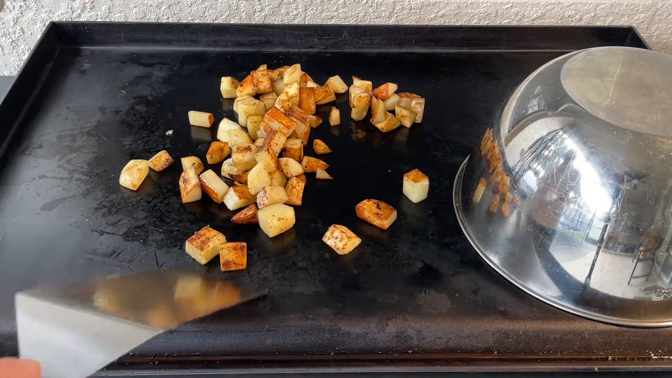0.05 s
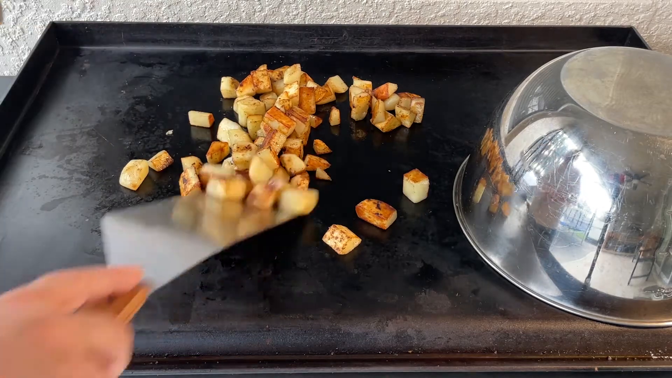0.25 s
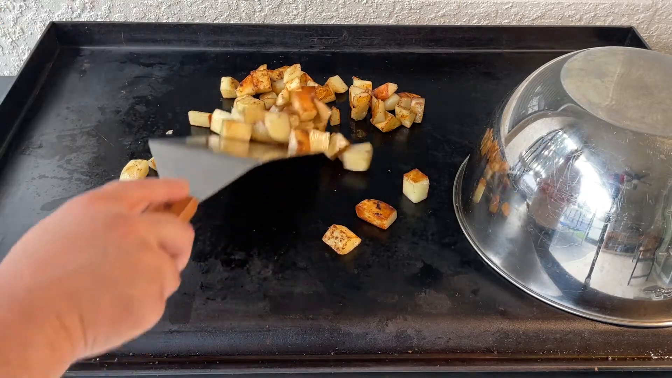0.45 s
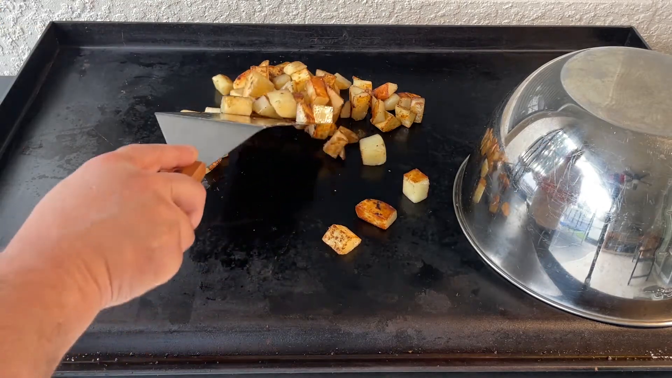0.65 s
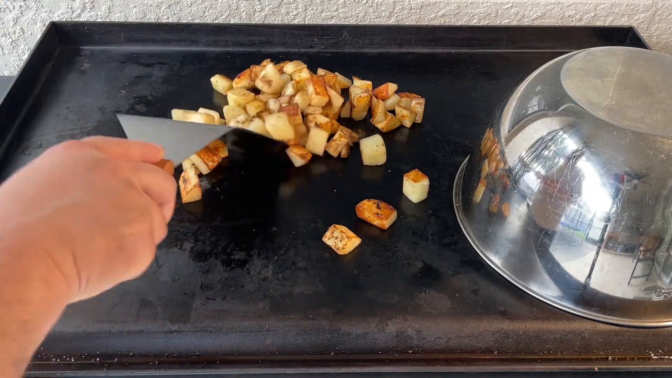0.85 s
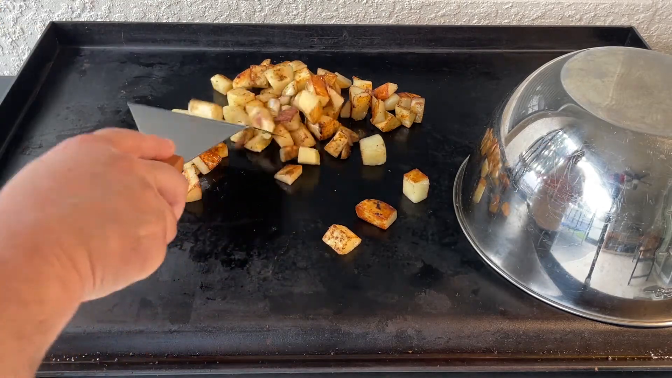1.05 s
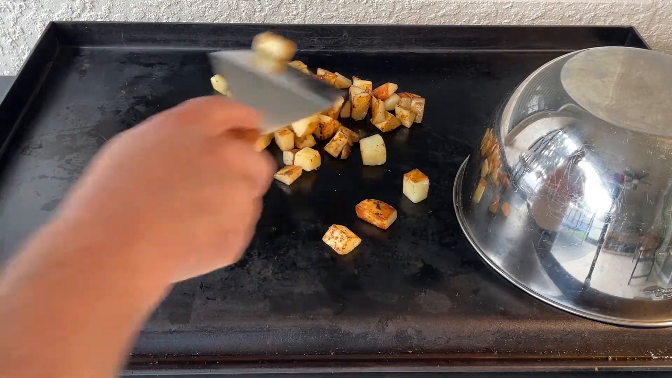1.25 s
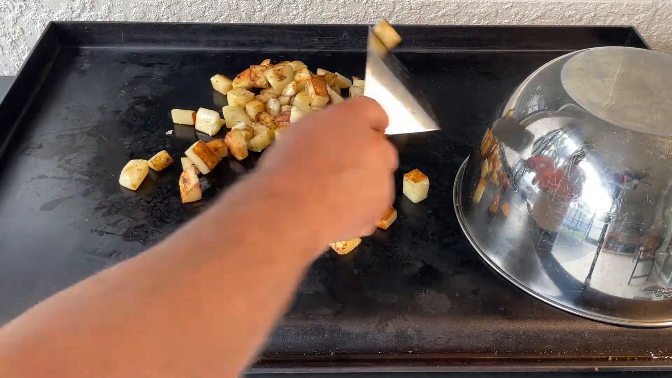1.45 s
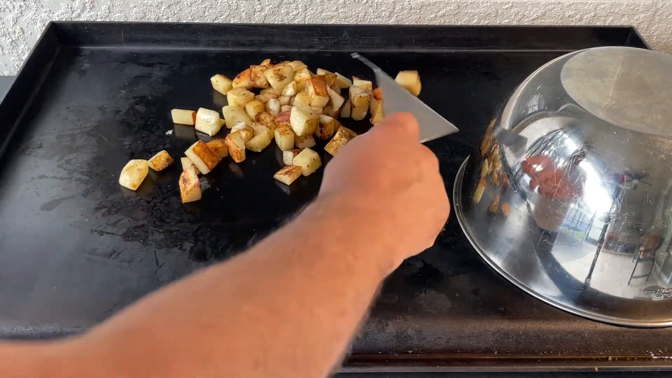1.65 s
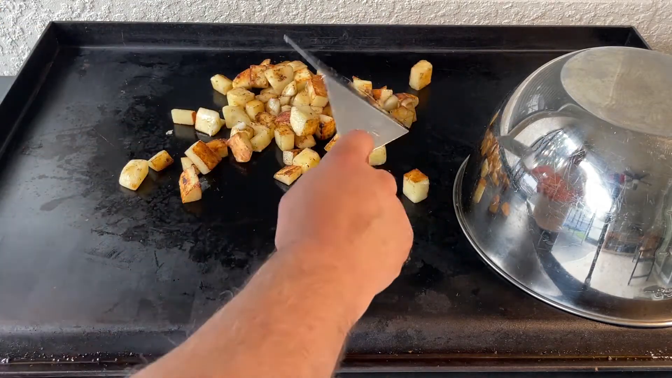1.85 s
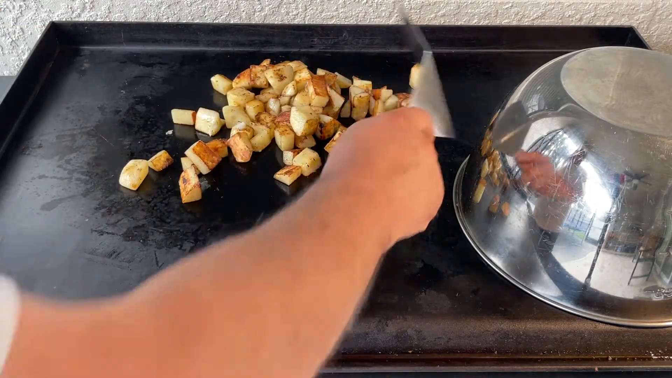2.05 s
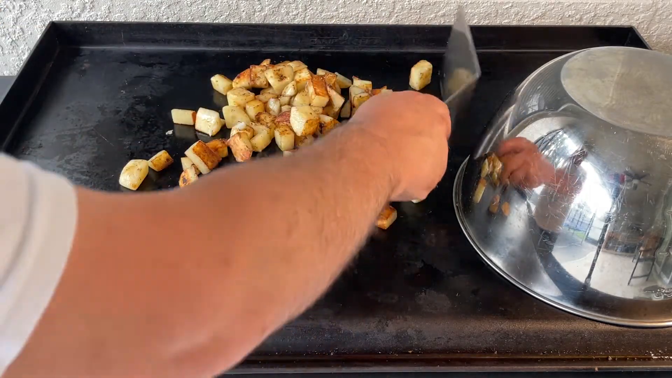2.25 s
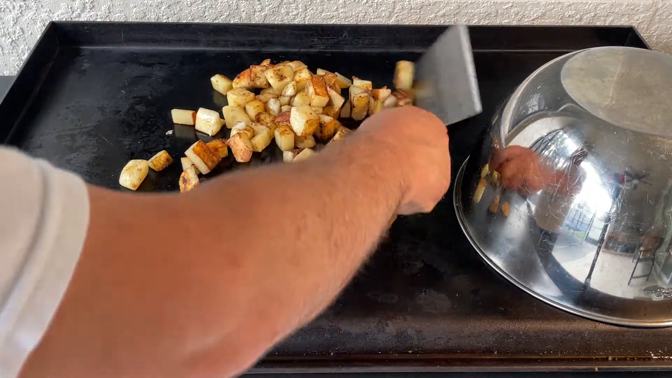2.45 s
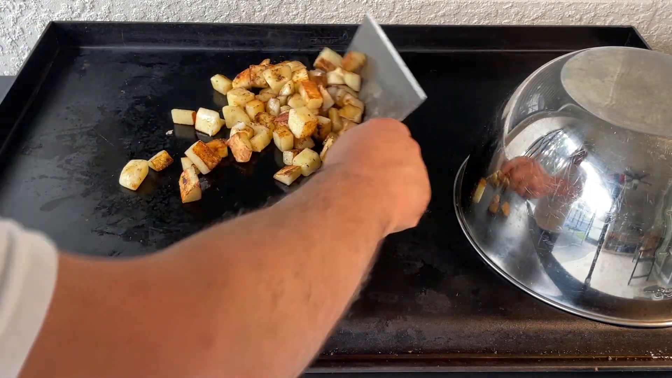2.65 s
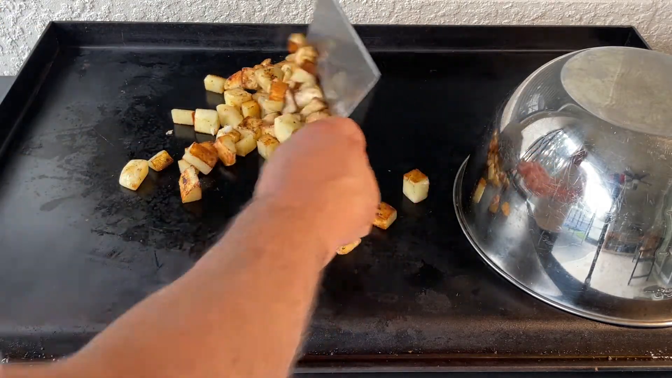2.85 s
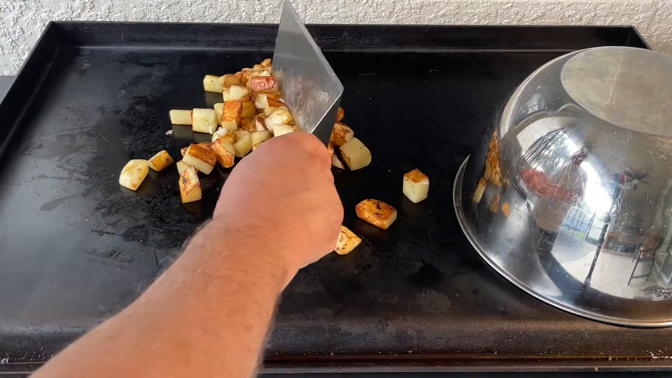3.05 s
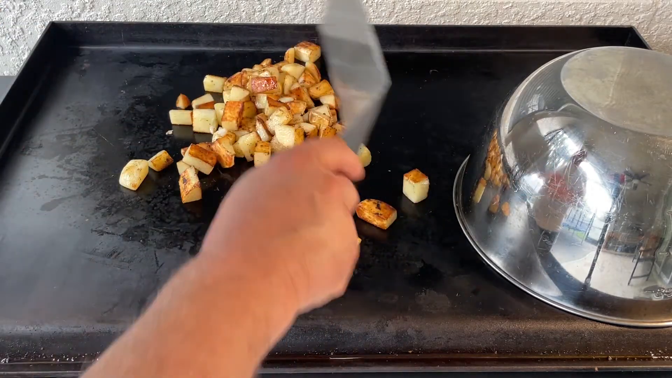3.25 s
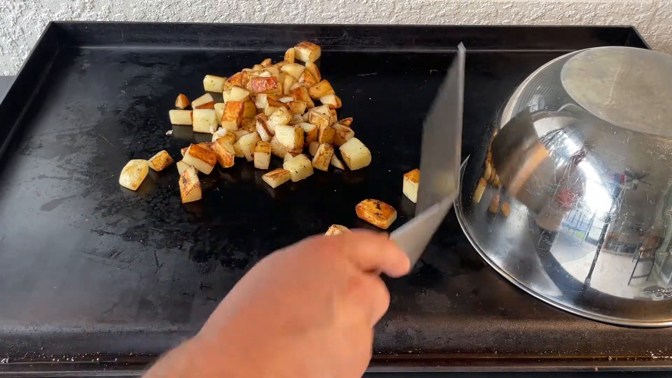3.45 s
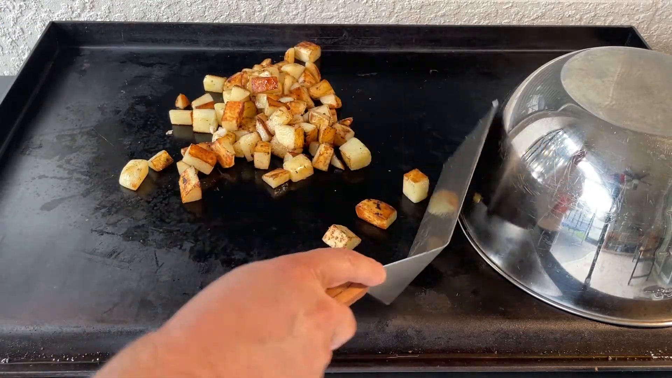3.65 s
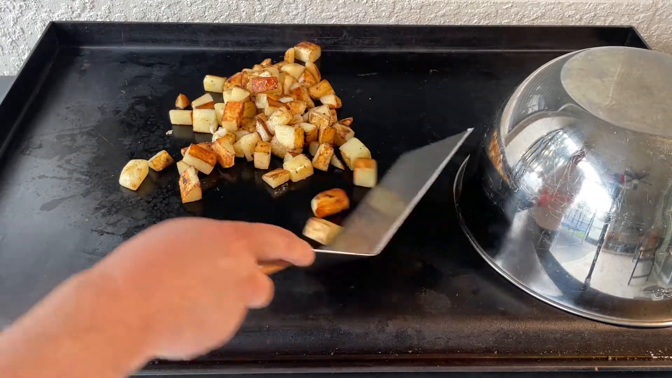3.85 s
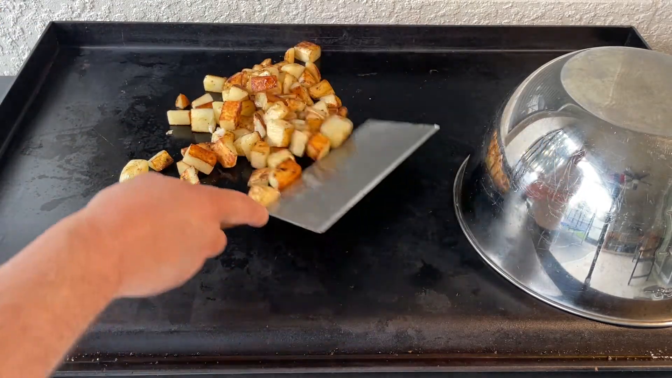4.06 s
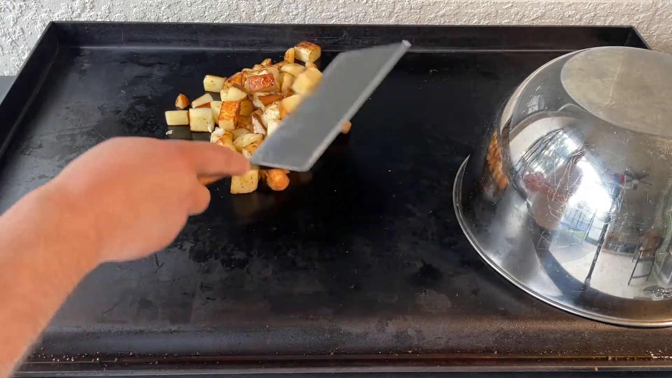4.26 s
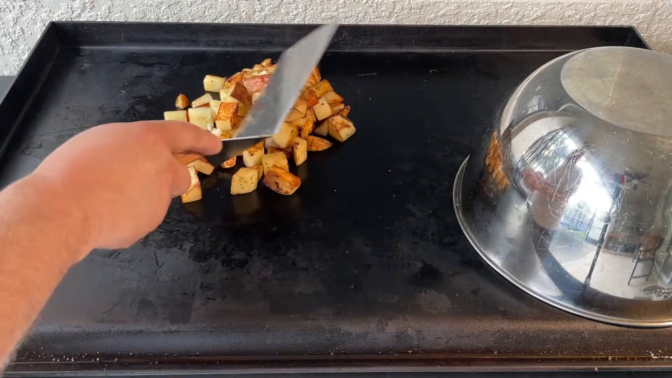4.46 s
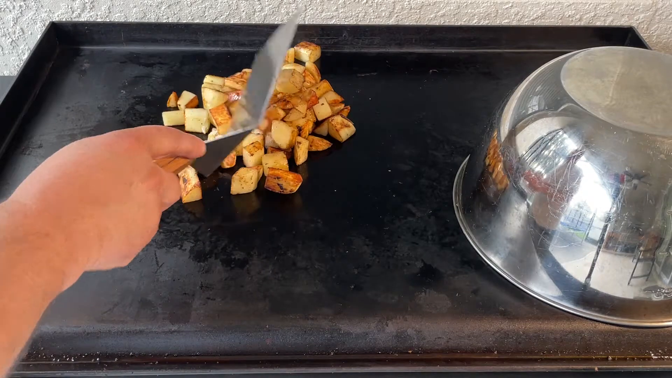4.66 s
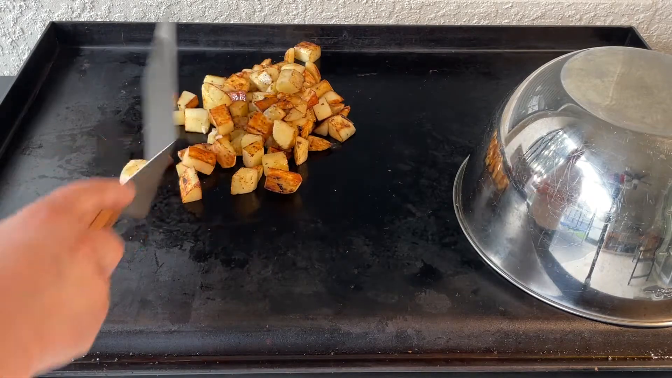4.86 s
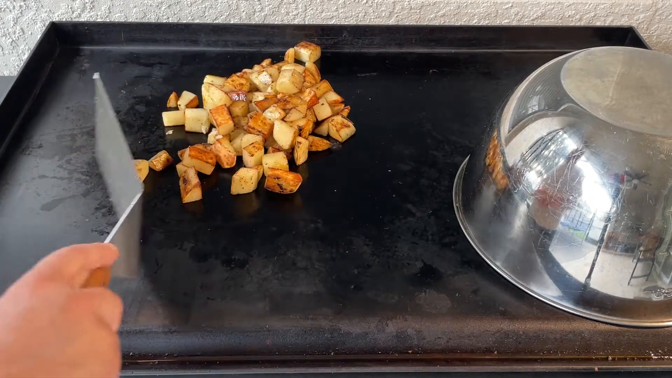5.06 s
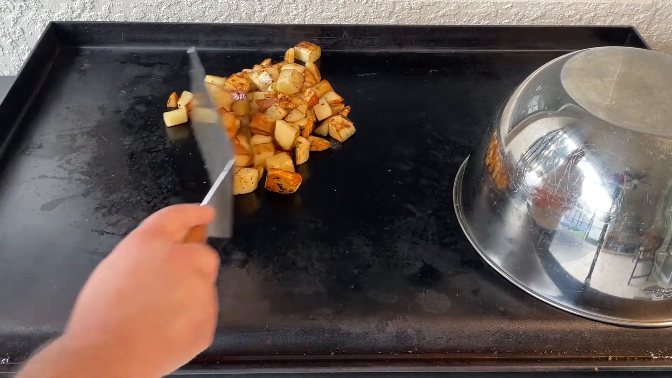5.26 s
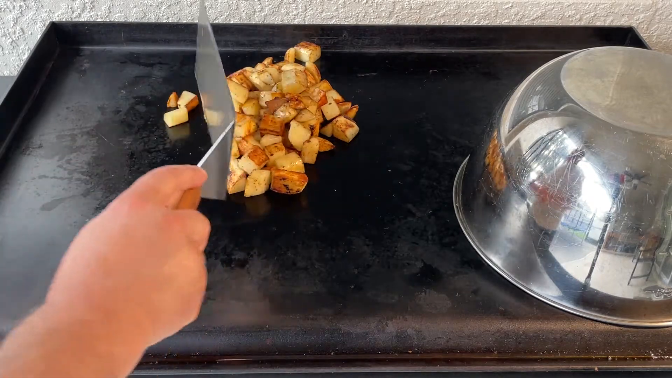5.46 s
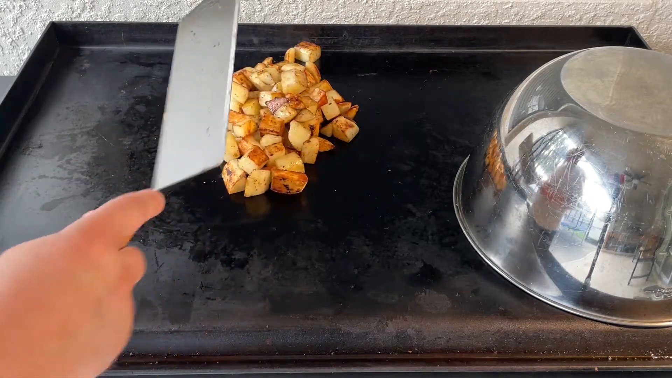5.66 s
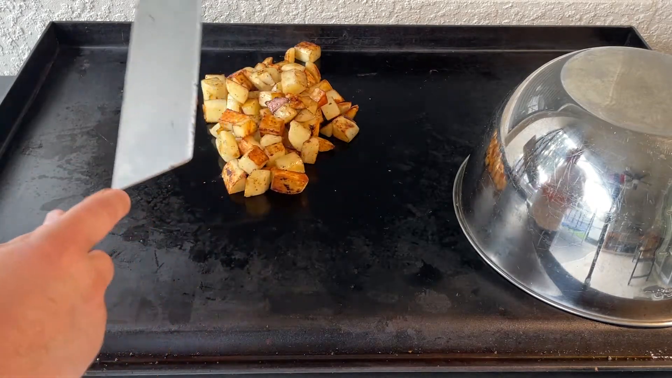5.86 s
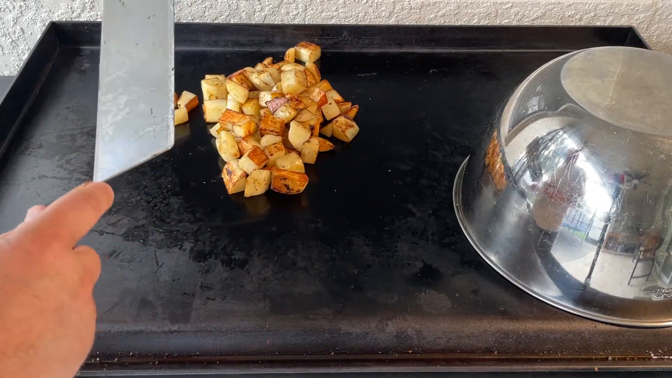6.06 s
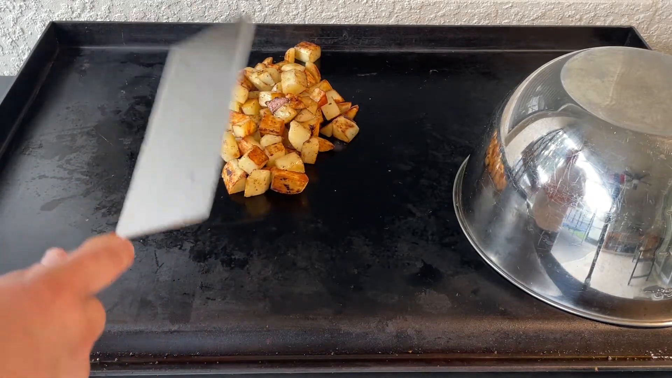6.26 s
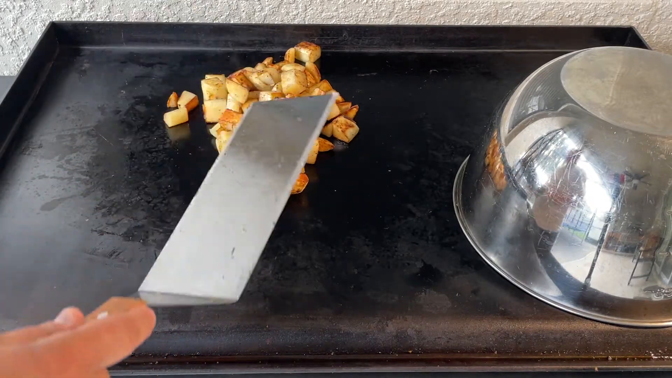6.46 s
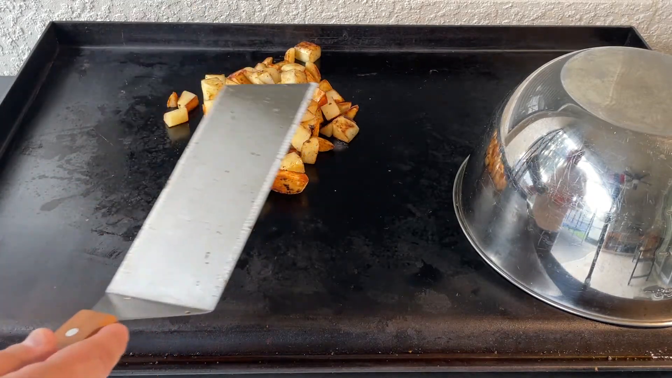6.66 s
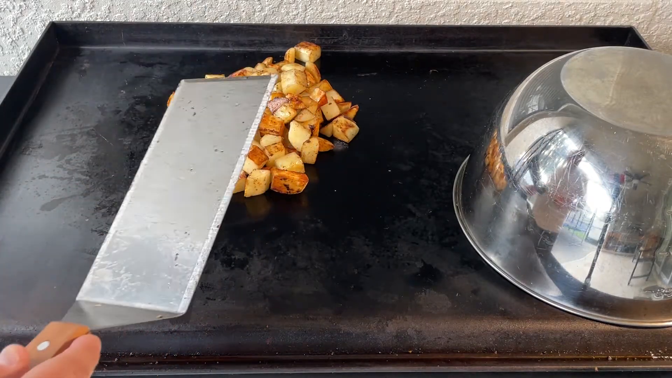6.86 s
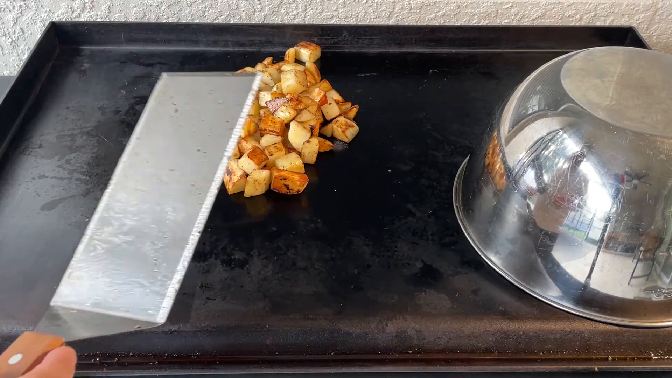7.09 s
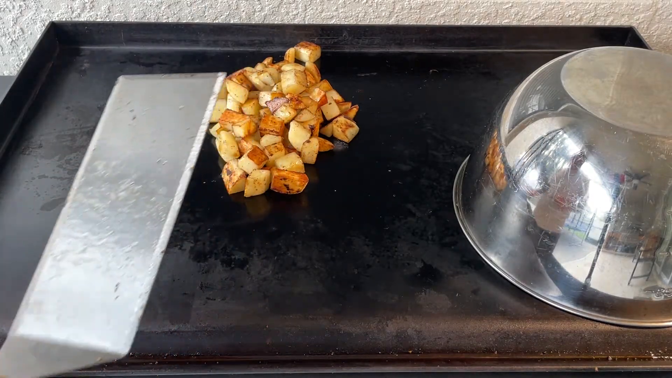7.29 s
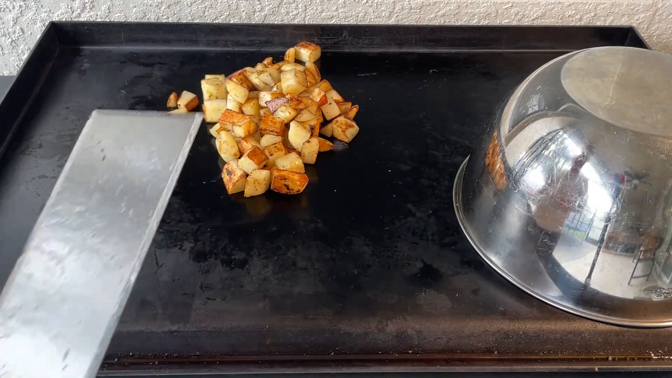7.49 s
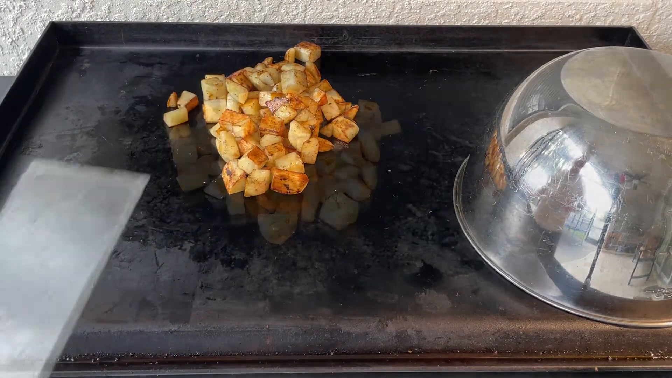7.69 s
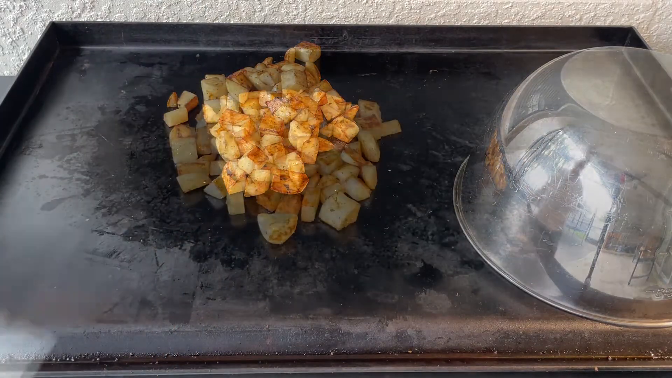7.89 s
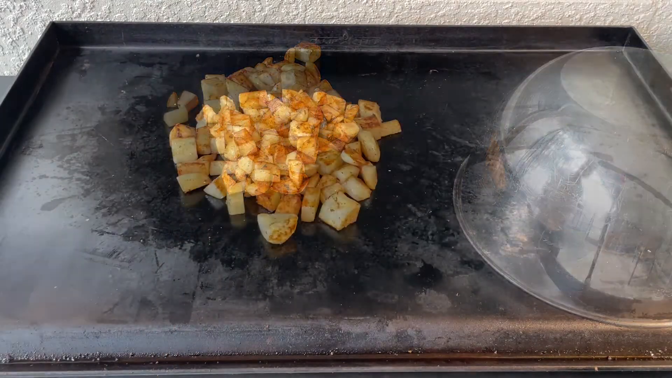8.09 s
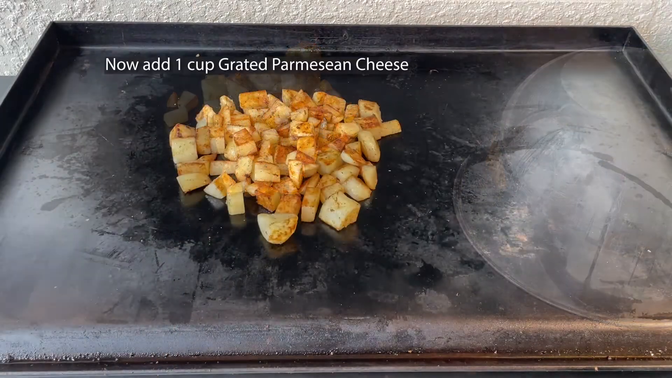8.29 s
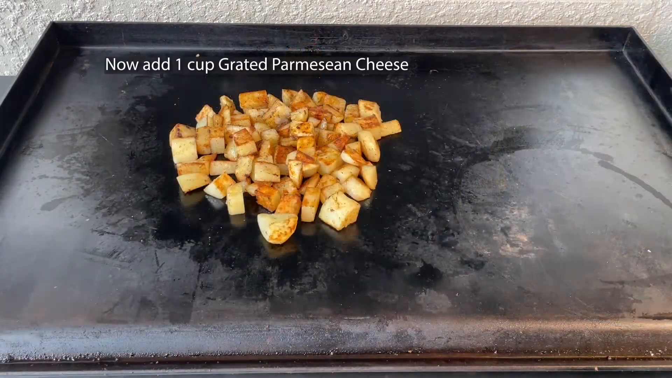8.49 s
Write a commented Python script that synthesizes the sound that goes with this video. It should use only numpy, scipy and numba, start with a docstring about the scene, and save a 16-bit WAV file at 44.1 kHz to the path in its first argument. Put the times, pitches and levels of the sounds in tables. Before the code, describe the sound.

Low gas burner rumble and fine frying hiss lie under bursts of metalwork, captured close in stereo in open air. A bright double clack and quick scrapes open, soft tumbling and oil snaps follow, then a clang, a long rasp, a short squeal and a strong ringing blow. After that it calms to a faint sizzle, a light rattle as the spatula is laid down, and dull hollow knocks.

```python
"""Outdoors at a gas griddle, a steel spatula knocks and scrapes fried potato cubes into a heap.
Blows and stick-slip friction excite the modes of the cooking plate, its frame and the thin blade.
Bursting steam bubbles sizzle and oil spits, livelier as the cubes are moved; burners rumble below.
Late on, the spatula is put down on a side shelf and something hollow knocks nearby."""
import sys
import numpy as np
from scipy import signal
from scipy.fft import rfft, irfft
from scipy.io import wavfile
from scipy.ndimage import uniform_filter1d
from numba import njit

SR = 44100
rng = np.random.default_rng(int(sys.argv[2]) if len(sys.argv) > 2 else 0)


def int16_out(signal):
    """Quantize to a 16-bit WAV file."""
    q = np.round(np.clip(np.atleast_2d(signal).T, -1, 1) * 32767)
    wavfile.write(sys.argv[1], SR, q.astype(np.int16))


N = 376153
T = np.arange(N) / SR


def undb(db):
    """Logarithmic level: decibels to amplitude gain."""
    return 10 ** (np.asarray(db) / 20)


def unit(x):
    """Normalisation: scale to rms 1."""
    return x / np.sqrt(np.mean(x ** 2) + 1e-20)


def lookup(points, hz):
    """Interpolation of (Hz, value) points on a log-frequency axis."""
    point_hz, value = np.transpose(points)
    return np.interp(np.log(hz + 1), np.log(np.sort(point_hz) + 1), value)


def colour(x, points):
    """Linear filtering: multiply the spectrum by a (Hz, dB) curve."""
    size = x.shape[-1]
    gain = undb(lookup(points, np.fft.rfftfreq(size, 1 / SR)))
    return irfft(rfft(x) * gain, size)


def stereo(mid, side, width):
    """Mid-side sum: left and right from a shared and an opposed part."""
    return np.array([mid + width * side, mid - width * side])


def add(out, s, x):
    """Superposition: mix x into out from time s on."""
    start = max(int(s * SR), 0)
    out[:, start:start + x.shape[1]] += x[:, :N - start]


def walk(rate):
    """Slow random fluctuation: steps at the given rate, smoothed twice."""
    hold = int(SR / rate)
    steps = np.repeat(rng.standard_normal(N // hold + 1), hold)
    return 1.3 * uniform_filter1d(uniform_filter1d(steps, hold), hold)[:N]


def grains(rate, spread_db, size=N):
    """Shot noise: random impulses of either sign, their levels spread exponentially in dB."""
    hit = rng.random(size) < rate / SR
    strength = undb(spread_db * np.minimum(rng.exponential(size=size), 6))
    return unit(hit * strength * rng.choice([-1, 1], size))


def wide_noise(size, width, spectrum):
    """Broadband noise, coloured and of unit rms, with a partly opposed left and right."""
    mid, side = rng.standard_normal((2, size))
    return unit(colour(stereo(mid, side, width), spectrum))


def swell(s, rise_s, hold_s, fall_s):
    """Envelope from time s on: a smooth rise, a hold and an exponential fall."""
    rise = np.sin(np.pi / 2 * np.clip((T - s) / rise_s, 0, 1)) ** 2
    return rise * np.exp(-np.maximum(T - s - rise_s - hold_s, 0) / fall_s)


@njit
def ring(hz, t60, weight, size):
    """Modal superposition: decaying sinusoids, each with a complex weight left and right."""
    out = np.zeros((2, size))
    for k in range(len(hz)):
        pole = np.exp((2j * np.pi * hz[k] - np.log(1000) / t60[k]) / SR)
        z = 1 + 0j
        for i in range(min(size, int(t60[k] * SR))):
            out[0, i] += (weight[0, k] * z).imag
            out[1, i] += (weight[1, k] * z).imag
            z *= pole
    return out


def body(modes, crowd, count, t60, damping, scatter):
    """Modal density: weaker modes lie evenly, ring about t60 at 1 kHz and die sooner higher up."""
    low_hz, high_hz = crowd[0][0], crowd[-1][0]
    hz = low_hz + (high_hz - low_hz) * (np.arange(count) + rng.random(count)) / count
    decay = t60 * (hz / 1000) ** -damping * np.exp(scatter * rng.standard_normal(count))
    rows = np.vstack([*modes, np.column_stack([hz, lookup(crowd, hz), decay])])
    is_main = np.arange(len(rows)) < len(modes)
    return np.column_stack([rows, is_main])  # columns: Hz, dB, t60 s, is main


def response(modes, width, low_hz=0, cut_hz=np.inf, length=1, place_db=0.8, lift_db=0):
    """Impulse response: a tap near the stiff rim misses the low modes, a soft one the high ones."""
    hz, db, t60, is_main = modes.T
    # the place of contact weights the modes at random
    place, phase, bearing = rng.standard_normal((len(hz), 3)).T
    gain = undb(db + place_db * place + lift_db * is_main)
    gain = gain / np.sqrt(1 + (low_hz / hz) ** 4 + (hz / cut_hz) ** 4)
    spread = stereo(1.0, np.exp(2j * np.pi * bearing), width)
    weight = gain * np.exp(2j * np.pi * phase) * spread
    return ring(hz, np.clip(t60 * length, .01, 5), weight, 2 * SR)


def drive(force, tap):
    """Convolution of a force with a body's response, scaled by the energy of that response."""
    return signal.fftconvolve(force[None], tap, axes=1) / np.sqrt(np.sum(tap ** 2) / 2)


def impact(t, chatter, rate, spread_db, decay_s):
    """Impulsive contact: fading chatter with a unit impulse added at its start."""
    force = chatter * grains(rate, spread_db, size=len(t)) * np.exp(-t / decay_s)
    force[0] += 1
    return force


# spectrum of the burner rumble: frequency_hz, relative_level_db
BURNER_SPECTRUM = [(20, -46), (31, -17), (41, -3.5), (55, 5), (72, -3), (92, -15.5), (125, -7),
                   (215, -13.5), (300, -22), (500, -26.5), (900, -27), (1500, -33.5), (4000, -61)]


def burners():
    """Turbulent combustion noise: gas flames rumble and flutter, nearly alike left and right near 130 Hz."""
    mid, side = rng.standard_normal((2, N))
    side = colour(side, [(60, -14.5), (130, -42), (300, -2.0), (900, -0.5)])
    rumble = unit(colour(stereo(mid, side, 1), BURNER_SPECTRUM))
    return rumble * undb(-40 + 1.0 * walk(11))


# underlying sizzle, which dies down once the food is heaped and left alone: time_s, relative_level_db
SIMMER_LEVEL = [(0, -49.5), (4.9, -49.5), (6.8, -59.5), (8.5, -57.5)]
# pushes that turn moist faces of the cubes onto the steel:
# start_s, swell_s, drying_s, relative levels fine_hiss_db, coarse_frying_db, tumbling_db
STIR_PUSHES = [(0.38, .1, 0.094, -41.5, -55, -49), (0.81, 0.039, 0.59, -44.5, -54.5, -45),
               (1.251, 0.15, 0.39, -48.5, -55, -58), (1.783, 0.065, 0.42, -42.5, -46, -69),
               (2.91, 0.14, 0.5, -41, -40.5, -44.5), (3.42, 0.087, 0.21, -40.5, -62.5, -63),
               (3.74, 0.015, 0.61, -56, -58, -37.5), (3.98, 0.14, 0.082, -45.5, -49.5, -60),
               (4.21, 0.084, 0.2, -42.5, -46.5, -65), (4.289, 0.21, 0.23, -40, -49, -65),
               (5.42, 0.1, 1, -53, -72, -53), (7.18, 0.46, .4, -51, -71, -66)]
# spectra of fine hiss, coarse frying and tumbling cubes: frequency_hz, relative_level_db
HISS_SPECTRUM = [(2500, -57), (5500, -6), (8500, -2.5), (11000, 2.5), (16000, 0.5)]
FRYING_SPECTRUM = [(300, -5), (900, -7), (2000, -0.5), (5000, 0), (7500, -4), (12000, -68)]
TUMBLE_SPECTRUM = [(30, -20), (90, 8), (190, 6), (350, -2), (800, -9), (1500, -9), (4000, -10.5)]
SETTLE_DB = -51  # cubes settling in the heap, relative like the tumbling levels


def frying(frame, plate):
    """Bubble noise: bursting steam hisses and crackles, flaring at each push; soft cubes bump the steel."""
    simmer_db = np.interp(T, *np.transpose(SIMMER_LEVEL))
    power = undb([simmer_db, simmer_db, np.full(N, SETTLE_DB)]) ** 2
    for s, rise_s, dry_s, hiss_db, fry_db, tumble_db in STIR_PUSHES:
        flare = undb([[hiss_db], [fry_db], [tumble_db]]) * swell(s, rise_s, 0, dry_s)
        power = power + flare ** 2
    hiss, fry, tumble = np.sqrt(power)
    fine = stereo(grains(rate=15000, spread_db=3.5), grains(rate=14000, spread_db=0), width=0.0088)
    coarse = stereo(grains(rate=9000, spread_db=3.0), grains(rate=9000, spread_db=-2), width=0.051)
    out = unit(colour(fine, HISS_SPECTRUM)) * hiss * undb(7.5 + 1.0 * walk(45))
    out += unit(colour(coarse, FRYING_SPECTRUM)) * fry * undb(3.5 + 0.88 * walk(35))
    bumps = unit(colour(grains(rate=160, spread_db=2.5), TUMBLE_SPECTRUM)) * tumble
    out += undb(-5.5) * drive(bumps, response(frame, width=0.3, length=0.14))[:, :N]
    out += undb(-3.0) * drive(bumps, response(plate, width=0.58, length=0.46))[:, :N]
    return out


# the loudest spits of oil: start_s, relative_level_db
LOUD_SPITS = [(0.4888, -27), (0.557, -34), (0.844, -26), (1.458, -25), (2.165, -24), (2.4277, -25.5),
              (3.507, -26), (3.5327, -23.5), (6.122, -29.5), (6.233, -33.5), (6.434, -31.5), (6.558, -37),
              (7.199, -36), (7.392, -41.5), (7.423, -39)]
# spectrum of a spit: frequency_hz, relative_level_db
SPIT_SPECTRUM = [(600, -31), (2000, -1.5), (5000, 2.5), (9000, 0), (16000, 5.5)]
SMALL_SPITS_PER_S, SMALL_SPIT_DB, SMALL_SPIT_SPREAD_DB = 1.7, -47, 11  # spread is plus or minus


def spits():
    """Transient bursts: drops snap in the oil with a brief spray; small ones come at random."""
    out, t = np.zeros((2, N)), T[:SR // 25]
    small = []
    for _ in range(int(SMALL_SPITS_PER_S * T[-1])):
        db = SMALL_SPIT_DB + SMALL_SPIT_SPREAD_DB * rng.uniform(-1, 1)
        small.append((rng.uniform(0, T[-1]), db))
    snap_and_spray = np.exp(-t / 0.0017) + 0.29 * np.exp(-t / 0.02)
    for s, db in LOUD_SPITS + small:
        add(out, s, undb(db) * wide_noise(len(t), 0.074, SPIT_SPECTRUM) * snap_and_spray)
    return out


# dull knocks of something hollow set down nearby: start_s, level_db, cutoff_hz, gritty_contact_db
HOLLOW_KNOCKS = [(8.112, -25.5, 1700, -43), (8.120, -24, 4500, -38), (8.155, -27, 1300, -52),
                 (8.236, -35, 4500, -36)]
# main modes of the hollow thing: frequency_hz, relative_level_db, t60_s
HOLLOW_MODES = [(125.2, 1.5, 0.76), (315, -9, 0.73), (518, 9, 0.5), (900, 4, 0.4), (1014, 7, 0.48)]
# its crowd of weaker modes: frequency_hz, relative_level_db
HOLLOW_WEAK_MODES = [(150, -8), (400, 2), (750, -0.5), (1000, 0.5), (1600, -6), (2300, -1), (3300, -7.5),
                     (4600, -10), (6500, -23)]
# spectrum of the gritty contact: frequency_hz, relative_db_per_hz
GRIT_SPECTRUM = [(300, -12), (900, 1), (2300, 3), (4500, -5), (7000, -12), (12000, -20)]


def knocks():
    """Damped resonance: a hollow body lands on one edge, then settles with a gritty touch."""
    out, t = np.zeros((2, N)), T[:SR // 8]
    attack = SR // 25  # samples over which the level is set
    hollow = body(HOLLOW_MODES, HOLLOW_WEAK_MODES, count=240, t60=0.51, damping=0.36, scatter=0.044)
    for s, db, cut_hz, grit_db in HOLLOW_KNOCKS:
        force = impact(t, chatter=0.063, rate=900, spread_db=3.0, decay_s=0.011)
        sound = drive(force, response(hollow, width=0.43, cut_hz=cut_hz))
        add(out, s, sound * undb(db) / sound[:, :attack].std())
        grit = unit(colour(grains(rate=4000, spread_db=2.0, size=len(t)), GRIT_SPECTRUM))
        add(out, s, stereo(grit, 0, 0) * undb(grit_db) * np.exp(-t / 0.018))
    return out


# modes of the blade's tip, then of the shelf under the handle: frequency_hz, relative_level_db, t60_s
TIP_MODES = [(2940, 1, .07), (3910, -6, 0.27), (5030, -7, .08), (5230, 12, 0.041), (7130, 1, .07),
             (8450, 0, .03)]
SHELF_MODES = [(343, 9.5, .2), (383, 11, 0.19), (663, 3, 0.49), (1070, 4.5, 0.25), (1140, 6, 0.26),
               (1220, 1, .2), (1810, -4, 0.23), (1800, -2, 0.22), (2010, -6, 0.29), (2080, 1, 0.31),
               (2850, -6, 0.18)]
PUT_DOWN_S, HANDLE_LAG_S = 7.5078, 0.009
TIP_DB, SHELF_DB = -41.5, -42.5  # gains on the summed modes


def put_down():
    """Successive impacts: the tip ticks on the side shelf and the handle drops after it with a small rattle."""
    out, t = np.zeros((2, N)), T[:SR // 8]
    landings = ((PUT_DOWN_S, TIP_DB, TIP_MODES), (PUT_DOWN_S + HANDLE_LAG_S, SHELF_DB, SHELF_MODES))
    for s, db, modes in landings:
        force = impact(t, chatter=0.022, rate=600, spread_db=2.5, decay_s=0.025)
        tap = response(np.column_stack([modes, np.ones(len(modes))]), width=0.4, length=1.0)
        add(out, s, undb(db) * signal.fftconvolve(force[None], tap, axes=1))
    return out


# squeals of the slipping edge; the last row is a short ring, perhaps of a nudged bowl:
# start_s, length_s, pitch_hz, level_db
SQUEAL_TONES = [(0.008, .035, 10900, -25), (0.235, .05, 5860, -32), (3.748, .056, 3970, -20.5),
                (3.742, .062, 5110, -21), (3.742, .03, 9950, -25), (3.865, .125, 10120, -35),
                (3.915, .07, 6130, -38), (3.895, .11, 7190, -38), (3.905, .1, 11200, -35),
                (3.87, .09, 9320, -38), (4.78, .11, 1620, -47), (5.27, .22, 3060, -38),
                (5.29, .17, 3623, -42), (3.741, .032, 790, -19)]


def squeals():
    """Frequency modulation: squeals of the slipping edge and one short ring waver, swell and die."""
    out = np.zeros((2, N))
    for s, length_s, hz, db in SQUEAL_TONES:
        size = int(length_s * SR)
        waver, flutter = (unit(uniform_filter1d(x, SR // 200)) for x in rng.standard_normal((2, size)))
        phase = 2 * np.pi * np.cumsum(hz * (1 + 0.0062 * waver)) / SR
        tone = unit(np.sin(phase) * undb(3.5 * flutter))
        add(out, s, stereo(tone, 0, 0) * signal.windows.hann(size) * undb(db))
    return out


# main modes of the cooking plate: frequency_hz, t60_s, then relative levels when touched at
# left_db, front_db, middle_db, back_db, far_corner_db, right_db
PLATE_MAIN_MODES = [(479, 1.9, -16.5, -10, -24, -8.5, -26.5, -11.5),
                    (577, 1.5, -13, -9, -11.5, -10.5, -15, -7),
                    (624, 0.83, -15, -21, -29.0, -21, -24.0, -16),
                    (731, 1.74, -18.0, -10, -19, -15, -20.5, -26),
                    (776.0, 1.4, -18, -8.0, -20.0, -8.0, -17.5, -7),
                    (803.0, 1.55, -16.5, -7, -23, -21, -31.5, -12),
                    (967.0, 0.7, -11.5, -16.0, -21, -11, -13, -12.5),
                    (992, 0.52, -21, -16, -26, -16.0, -7, -19), (1103, 1.26, -8.5, -9.5, -11, -1, -12, -12),
                    (1138, 0.76, -12, -1, -1.5, 1, -23.5, 2), (1166, 1.1, -14, -8, -21.5, -2, -28, -18.0),
                    (1273, 1.15, -20, -4, -26.0, -19.0, -22, -9),
                    (1404, 1.1, -10, -2, -5.5, -2.5, -11, -10.0), (1416, 0.3, -2.5, 4.5, -7.5, 5, 6, -4.0),
                    (1434, 2.37, -12, -4.5, -16.5, -8.0, -18.5, -17.5),
                    (1482, 1.5, -11.5, -12, -30.0, -8, -26.5, -27),
                    (1620.0, 0.77, -13.5, 2, -22, -14.0, -32, -26),
                    (1663.0, 0.89, -27.5, -6.0, -24, -16.0, -18.5, -9),
                    (1724.0, 1.1, -9.5, -3, -32.0, -10, -13, -15), (1773, 0.51, -0.5, -6, -26, -5, -7, -16),
                    (1906, 0.46, -24.0, -6, -19, -4.0, -6, -14),
                    (1984, 0.67, -6.5, -3, -21.0, -17.5, -15.0, -20),
                    (2030, 0.76, -9, -15.5, -18.0, -16, -22.0, -21),
                    (2120.0, 0.5, -24.5, -7, -17, 3, -10, -24),
                    (2160, 0.46, -6.5, -7, -12, -8.0, -5.5, -7.0),
                    (2184, 0.47, -6, -4, -12.5, -3, -9, -1.5),
                    (2211.0, 0.64, -22, -9, -25.5, -4, -28.0, -5),
                    (2315, 0.7, -24, -4, -19, 2.5, -24, -20.5),
                    (2385.0, 0.58, -9.0, -16.5, -24, -3, -33.0, -23),
                    (2420, 0.7, -14, -13, -22, -21.0, -24, -21),
                    (2541.0, 0.82, -17, -14, -18.5, -18, -28, -16),
                    (2651.0, 0.68, -17, -16.5, -21.5, 1, -17, -18),
                    (2733, 0.57, -17, 0, -14.5, 1, -11, -12.0),
                    (2864.0, 0.496, -8, -12, -19.5, -11, -16, -12.5),
                    (3010, 0.68, -14, -17, -20, -7, -27, -10.0),
                    (3200, 0.45, -14, -0.5, -18, -18.0, -26.5, -13),
                    (3270, 0.42, -19, -9, -17.0, 0, -25.0, -23),
                    (3460, 0.35, -21, -13.5, -15, -18.5, -25.5, -18.0)]
# names of those places of contact, in column order: place
CONTACT_PLACES = ("left", "front", "middle", "back", "corner", "right")
# the shifting load of blade and food detunes each mode (rms share) and makes it flutter (rms dB)
MODE_WANDER, MODE_FLUTTER_DB = 0.001195, 2


def plate_modes():
    """Modal energy storage: contacts feed the plate's main modes by place, and they ring out unevenly."""
    step = SR // 1000  # energies are followed in steps of about a millisecond
    work = np.zeros((len(CONTACT_PLACES), len(T[::step])))
    contacts = []
    for s, place, db, *_, chatter_s, _ in BLADE_BLOWS:
        contacts.append((place, db, swell(s, 1 / SR, 0, chatter_s)))
    for s, rise_s, hold_s, place, db, *_ in BLADE_STROKES:
        contacts.append((place, db, swell(s, rise_s, hold_s, PLATE_RELEASE_S)))
    for place, db, pressure in contacts:
        power = pressure[::step] ** 2
        work[CONTACT_PLACES.index(place)] += undb(db) ** 2 * power / power.sum()
    mid, side = np.zeros((2, N))
    for hz, t60, *place_db in PLATE_MAIN_MODES:
        fed = undb(place_db) ** 2 @ work + 1e-18
        kept = np.exp(-2 * np.log(1000) * step / (t60 * SR))  # energy share left after one step
        energy = signal.lfilter([1], [1, -kept], fed)
        load, flutter = (unit(uniform_filter1d(x, size=50)) for x in rng.standard_normal((2, len(fed))))
        # each push shifts the phase
        jostle = np.cumsum(rng.standard_normal(len(fed)) * np.sqrt(fed / energy / 2))
        drift = 2 * np.pi * hz * MODE_WANDER * np.cumsum(load) * step / SR
        phase = 2 * np.pi * hz * T + np.interp(T, T[::step], jostle + drift)
        swing = np.interp(T, T[::step], np.sqrt(energy) * undb(MODE_FLUTTER_DB * flutter))
        mid += swing * np.sin(phase)
        side += swing * np.sin(phase + 2 * np.pi * rng.random())
    return stereo(mid, side, width=0.37)


# strokes of the blade: start_s, swell_s, hold_s, place, then relative levels
# main_plate_modes_db, blade_db, weaker_plate_modes_db, frame_db
BLADE_STROKES = [(0.031, 0.023, 0.029, "front", -42, -30.5, -43, -38),
                 (0.101, 0.074, 0.047, "front", -39.5, -40, -34.5, -41.5),
                 (0.214, 0.042, 0.01, "front", -42.5, -25.5, -35, -39.5),
                 (0.29, 0.028, 0.009, "front", -43.5, -32, -35, -44),
                 (0.322, 0.025, 0.04, "front", -50.5, -51, -42, -43),
                 (2.43, 0.096, 0.025, "back", -42, -34.5, -32.5, -30),
                 (2.509, 0.078, 0.057, "back", -34, -30.5, -28, -37.5),
                 (3.746, 0.019, 0.0078, "right", -32, -21.5, -29, -27.5),
                 (3.852, 0.041, 0.068, "right", -38, -30, -30, -43),
                 (5.19, 0.071, 0.011, "left", -31, -43, -30.5, -28.5),
                 (5.31, 0.039, 0.025, "left", -32, -60, -44, -34)]
# spectrum of the rubbing force: frequency_hz, relative_level_db
RUB_SPECTRUM = [(40, -35), (100, -15), (200, 0.5), (500, -2.5), (1200, 3.5), (3000, 3), (7000, -1.5),
                (16000, 1)]
# as the hand eases off, the edge stops biting before it stops dragging
BLADE_RELEASE_S, PLATE_RELEASE_S = 0.044, 0.063


def scrapes(frame, plate, blade):
    """Stick-slip friction: the edge catches on the seasoned steel; its pressure damps the blade."""
    out = np.zeros((2, N))
    for s, rise_s, hold_s, _, _, blade_db, plate_db, frame_db in BLADE_STROKES:
        span = slice(int(s * SR), int(s * SR) + SR)
        rub = unit(colour(grains(rate=6000, spread_db=2.5, size=SR), RUB_SPECTRUM))
        slips = undb(2.2 * walk(160)[span]) * rub
        edge = slips * undb(blade_db) * swell(s, rise_s, hold_s, BLADE_RELEASE_S)[span]
        bed = slips * swell(s, rise_s, hold_s, PLATE_RELEASE_S)[span]
        blade_tap = response(blade, width=0.05, length=0.39, place_db=4.5, lift_db=1.5)
        add(out, s, undb(1.5) * drive(edge, blade_tap))
        add(out, s, stereo(edge, 0, 0))  # the rubbing itself, without resonance
        add(out, s, undb(plate_db - 2.0) * drive(bed, response(plate, width=0.37, length=0.45)))
        add(out, s, undb(frame_db) * drive(bed, response(frame, width=0.36)))
    return out


# blows of the spatula; the last row is the diffuse rattle of its being put down:
# start_s, place, then levels main_plate_modes_db (relative), frame_db,
# weaker_plate_modes_db, blade_db, contact_click_db, thump_db,
# then lowest_plate_hz, contact_cutoff_hz, chatter_s, ring_length_share
BLADE_BLOWS = [(0.0095, "front", -43.5, -33, -32, -22, -8, -32, 300, 5000, 0.0081, 0.71),
               (0.0268, "front", -43, -40, -31, -26.5, -6.5, -24, 300, 5000, 0.0037, 0.75),
               (0.862, "middle", -70, -52, -45, -62, -50, -43, 504, 1800, 0.0027, 0.25),
               (0.999, "middle", -64, -44.5, -52, -68, -62, -42, 300, 700, 0.0049, 0.5),
               (1.599, "middle", -37, -39, -40, -48, -46, -48, 750, 2080, 0.003, 0.54),
               (1.639, "middle", -38.5, -43, -55, -51, -53, -58, 912, 1256, 0.0044, 0.61),
               (2.223, "corner", -15, -25.5, -19, -32.5, -39, -20, 800, 2520, 0.02, 0.83),
               (3.715, "right", -62, -36.5, -53, -42.5, -31, -35, 312, 1480, 0.0023, 0.81),
               (3.744, "right", -32.5, -26, -39, -28.5, -14, -32, 500, 1500, 0.014, 0.77),
               (5.054, "left", -15, -26.5, -18, -21, -11.5, -12.5, 297, 4486, 0.0049, 1),
               (7.515, "left", -56, -43, -43.5, -51.5, -54.5, -58, 676, 2000, 0.016, 0.72)]
# spectra of the contact click and of the sheet giving way: frequency_hz, relative_db_per_hz
CLICK_SPECTRUM = [(40, -35), (150, -15), (400, -6.5), (2500, -11.5), (6000, -10.5), (10000, -2),
                  (16000, -3)]
THUMP_SPECTRUM = [(40, -45), (150, -19), (255, 6), (380, -8), (600, -1.5), (1100, -11), (3000, -37)]
BLADE_LIFT_DB = -1.5  # the main modes of the gripped blade stand out less
BLADE_CUT_RATIO = 2.9  # the light blade takes up higher frequencies from a contact than the plate does


def blows(frame, plate, blade):
    """Impact excitation: blows, and the final rattle, click, thump, chatter and ring three bodies."""
    out, t = np.zeros((2, N)), T[:SR // 8]
    attack = SR // 25  # samples over which each body's level is set
    for blow in BLADE_BLOWS:
        s, _, _, frame_db, plate_db, blade_db, click_db, thump_db, low_hz, cut_hz, chatter_s, length = blow
        force = impact(t, chatter=0.049, rate=900, spread_db=4.0, decay_s=chatter_s)
        frame_tap = response(frame, width=0.33, length=length)
        plate_tap = response(plate, width=0.31, low_hz=low_hz, cut_hz=cut_hz, length=length)
        blade_tap = response(blade, width=0.064, cut_hz=BLADE_CUT_RATIO * cut_hz, length=length,
                             lift_db=BLADE_LIFT_DB)
        for tap, db in ((frame_tap, frame_db), (plate_tap, plate_db), (blade_tap, blade_db)):
            sound = drive(force, tap)
            add(out, s, sound * undb(db) / sound[:, :attack].std())
        click = wide_noise(len(t), 0.027, CLICK_SPECTRUM)
        add(out, s, undb(click_db) * click * np.exp(-t / 0.0075))
        thump = wide_noise(len(t), 0.18, THUMP_SPECTRUM)
        add(out, s, undb(thump_db) * thump * np.exp(-t / 0.0061))
    return out


# strongest modes of the sheet-metal frame, then of the blade: frequency_hz, relative_level_db, t60_s
FRAME_MODES = [(169.2, -6, 0.99), (216, 1.5, 1), (265.6, 3.5, 0.27), (280, -11, 0.3), (339, 4, 0.16),
               (346, 9, 0.56), (542, 4, 0.26), (814, 1, 0.35)]
BLADE_MODES = [(3180, -1, 0.31), (3700, -28, 0.29), (5060, 8.5, 0.22), (5740, -12, 0.21), (6070, -9, 0.37),
               (6820, 5, 0.43), (7300, 4, 0.43), (9100, 7, 0.25), (9560, 9, 0.16), (10000, 0, 0.29),
               (10600, 11, 0.22), (10900, 4, 0.13), (11200, -7, .22), (12200, -4, .2)]
# the crowd of weaker modes in each body: frequency_hz, relative_level_db
FRAME_WEAK_MODES = [(130, -25), (260, -10), (400, -6.5), (750, -7.5), (1200, -13)]
PLATE_WEAK_MODES = [(400, -11), (900, -12.5), (1400, -12.5), (2100, -10.5), (3000, -12), (4500, -15.5),
                    (7500, -21)]
BLADE_WEAK_MODES = [(2200, -11.5), (3500, -3.5), (6000, 3.5), (9500, -7.5), (12500, 5), (16000, -22)]


def scene():
    """Superposition of all sources, with spatula and food sharing one griddle."""
    frame = body(FRAME_MODES, FRAME_WEAK_MODES, count=70, t60=0.74, damping=0.16, scatter=0.38)
    plate = body([], PLATE_WEAK_MODES, count=220, t60=1.0, damping=0.45, scatter=0.45)
    blade = body(BLADE_MODES, BLADE_WEAK_MODES, count=190, t60=0.46, damping=0.56, scatter=0.2)
    background = burners() + frying(frame, plate) + spits() + knocks()
    foreground = put_down() + squeals() + plate_modes() + scrapes(frame, plate, blade)
    return background + foreground + blows(frame, plate, blade)


# overall response: frequency_hz, gain_db
MIC_RESPONSE = [(20, -2.5), (6000, -1), (9000, 1.5), (11000, -3.5), (12800, -7.5), (14300, -2.5),
                (15600, -3)]
# level of left over right: frequency_hz, difference_db
STEREO_LEVEL = [(60, -0.4), (150, -2.5), (300, 0), (1100, 0.8), (2300, 1.5), (4400, 1.6), (9000, -0.5)]
# phase of left over right: frequency_hz, lead_rad
STEREO_PHASE = [(20, 0), (5900, 0), (7000, -1.3), (8250, -3.1), (11700, -6.3), (14900, -9.4), (16000, -9.9)]
TOP_HZ = 15950


def record(dry):
    """Linear filtering and saturation: left and right differ in level and phase; peaks round, the top is cut."""
    hz = np.fft.rfftfreq(N, 1 / SR)
    half = np.array([[1], [-1]]) / 2  # each channel takes half of the difference
    gain = undb(lookup(MIC_RESPONSE, hz) + half * lookup(STEREO_LEVEL, hz))
    channels = gain * np.exp(1j * half * lookup(STEREO_PHASE, hz))
    heard = irfft(rfft(dry) * channels, N)
    rounded = 1.25 * np.tanh(heard / 1.25)
    low_pass = signal.ellip(10, .2, 80, TOP_HZ, fs=SR, output="sos")
    return signal.sosfilt(low_pass, rounded)


dry = scene()
out = record(dry)
int16_out(out)
```